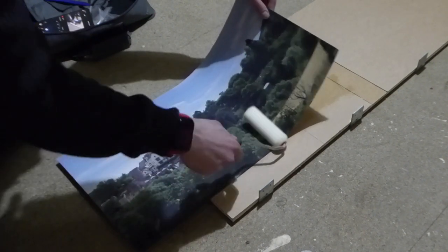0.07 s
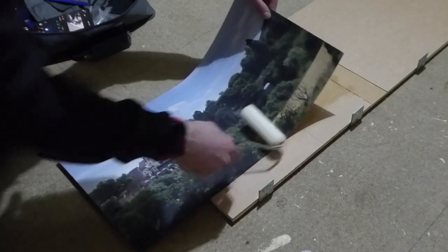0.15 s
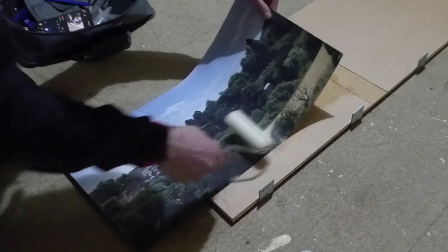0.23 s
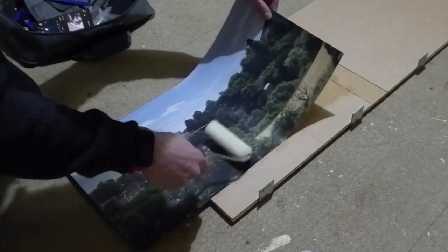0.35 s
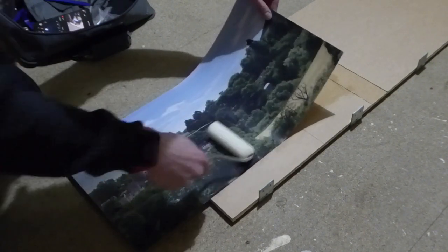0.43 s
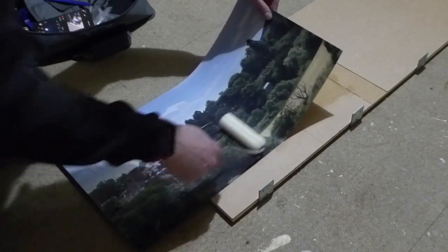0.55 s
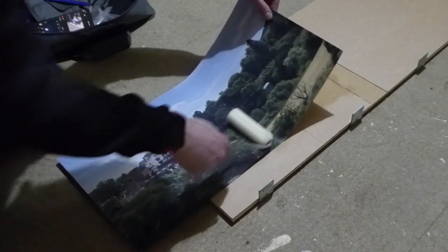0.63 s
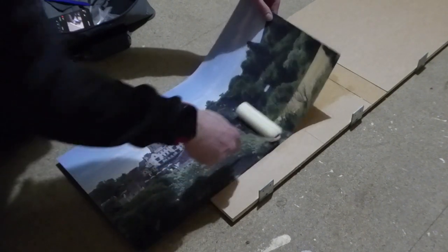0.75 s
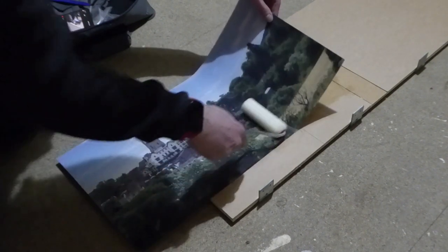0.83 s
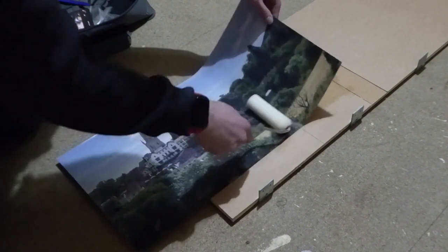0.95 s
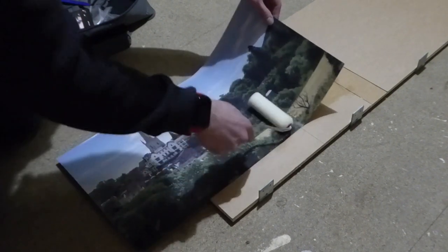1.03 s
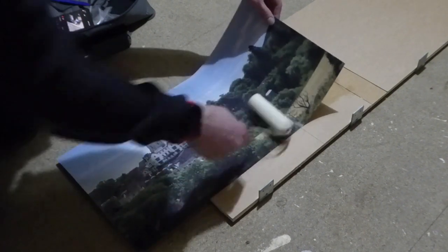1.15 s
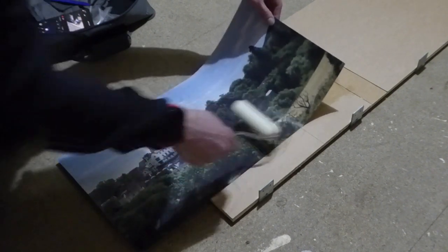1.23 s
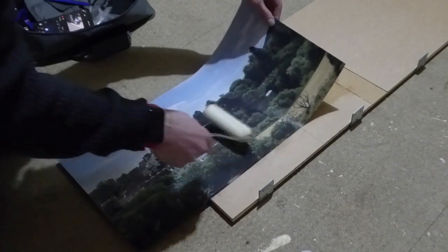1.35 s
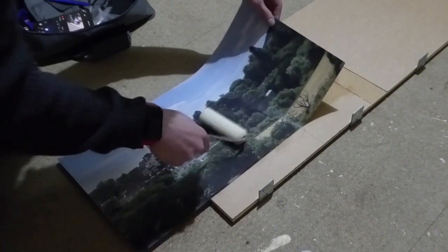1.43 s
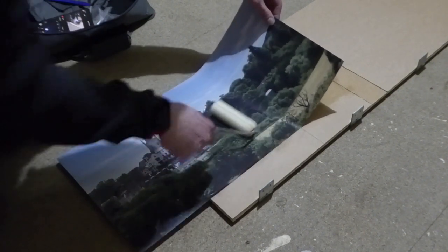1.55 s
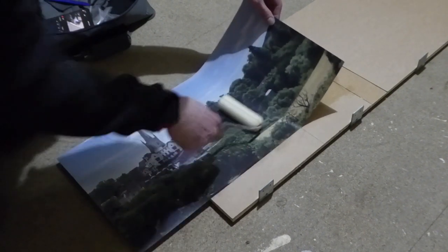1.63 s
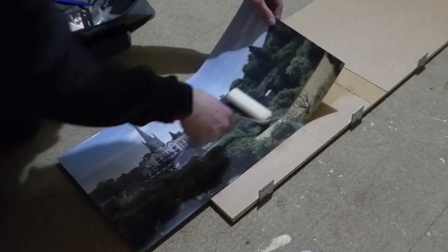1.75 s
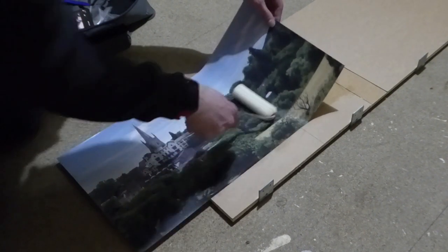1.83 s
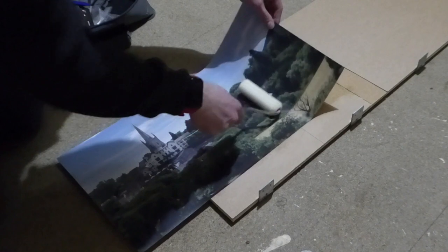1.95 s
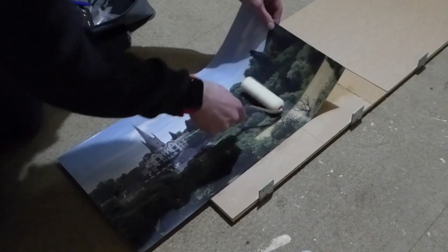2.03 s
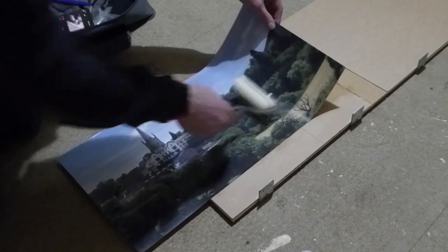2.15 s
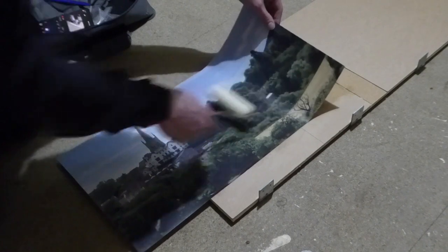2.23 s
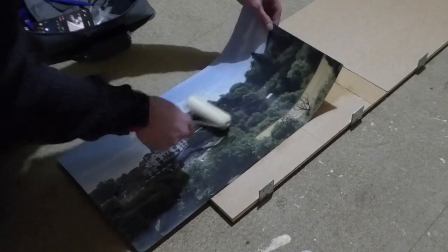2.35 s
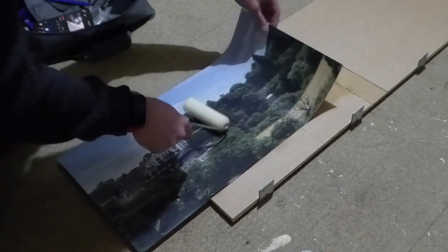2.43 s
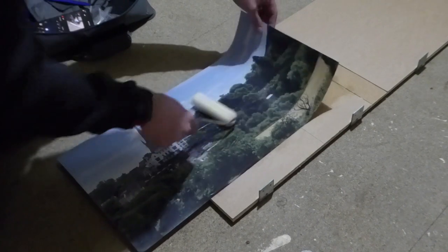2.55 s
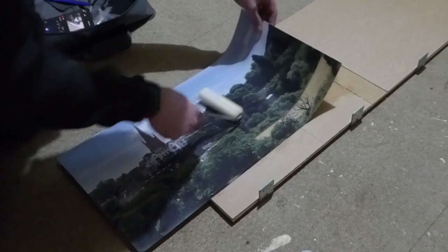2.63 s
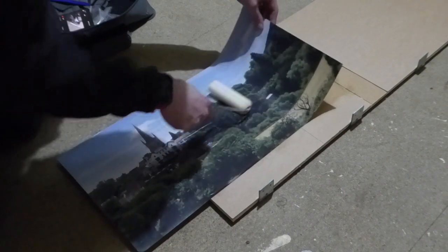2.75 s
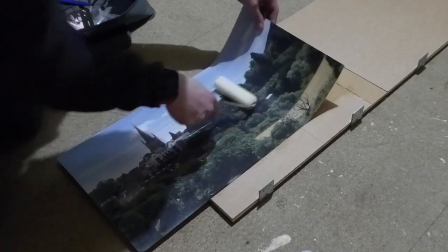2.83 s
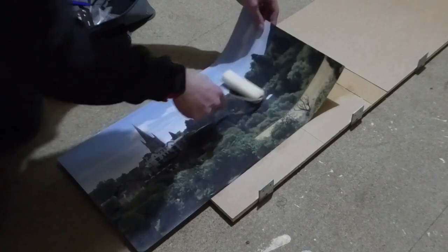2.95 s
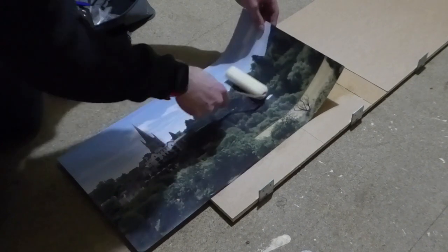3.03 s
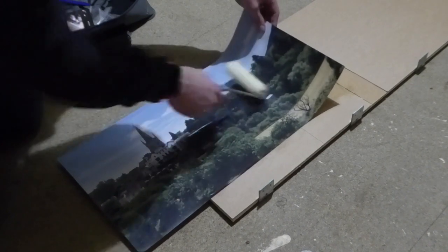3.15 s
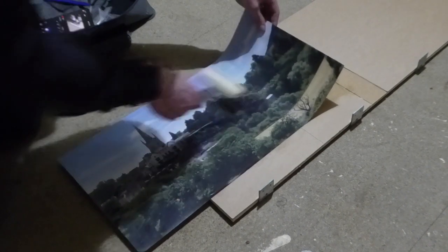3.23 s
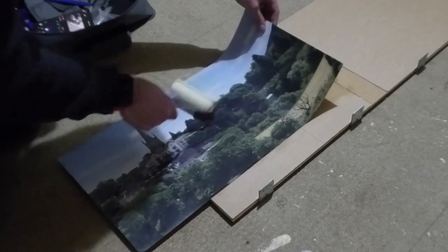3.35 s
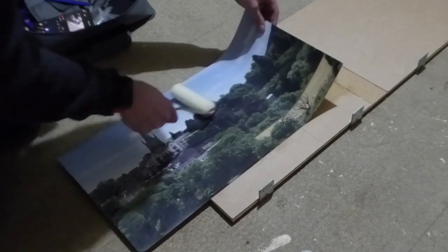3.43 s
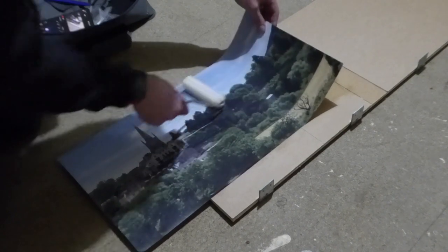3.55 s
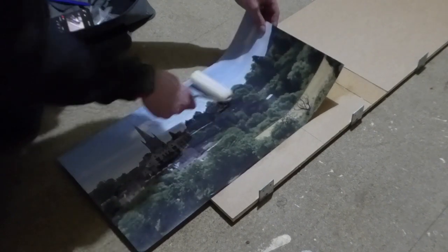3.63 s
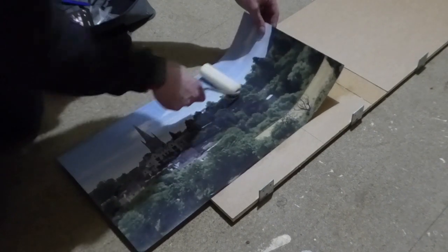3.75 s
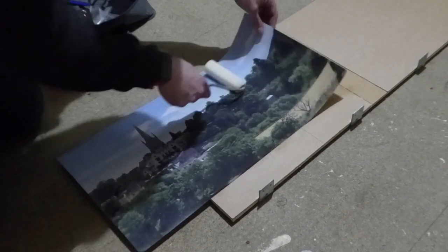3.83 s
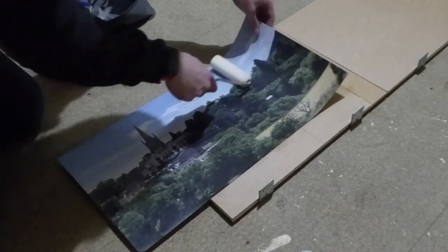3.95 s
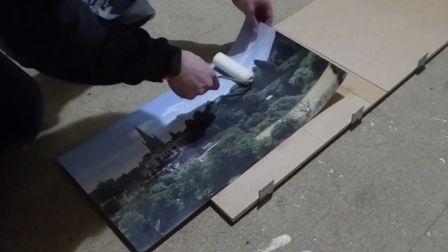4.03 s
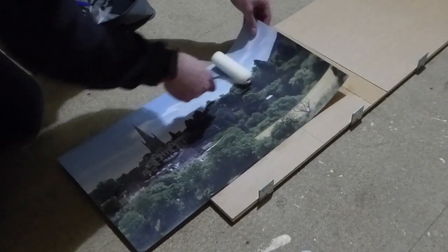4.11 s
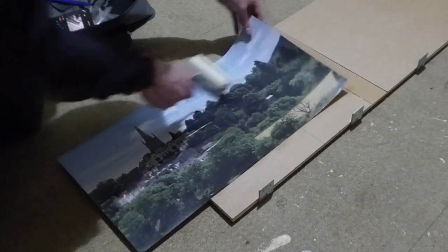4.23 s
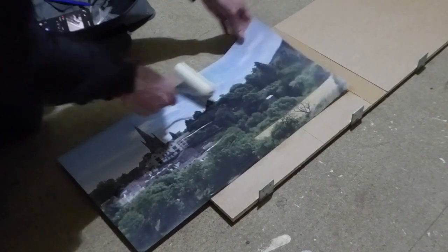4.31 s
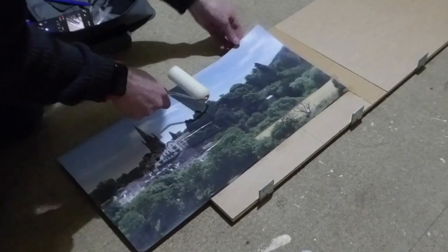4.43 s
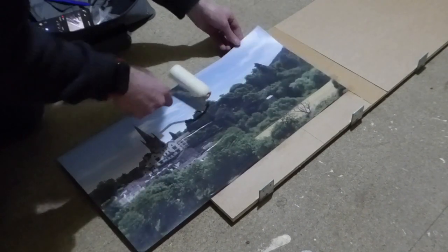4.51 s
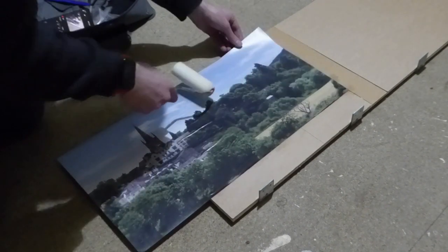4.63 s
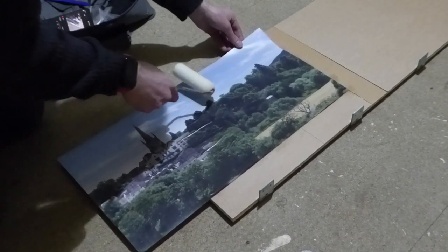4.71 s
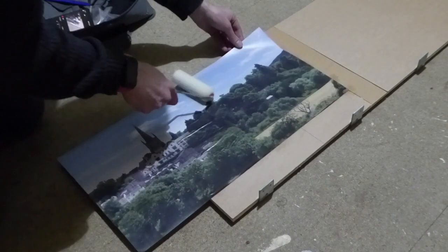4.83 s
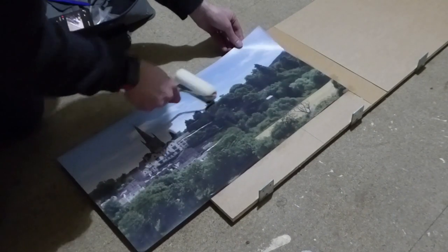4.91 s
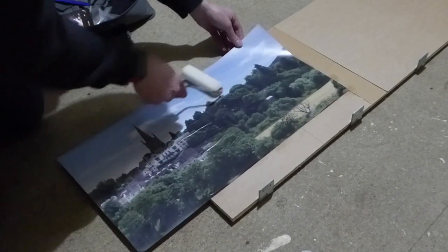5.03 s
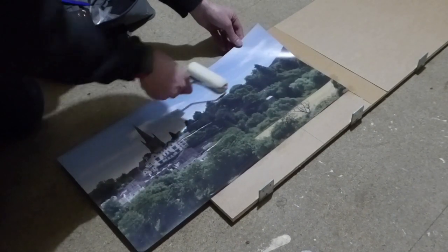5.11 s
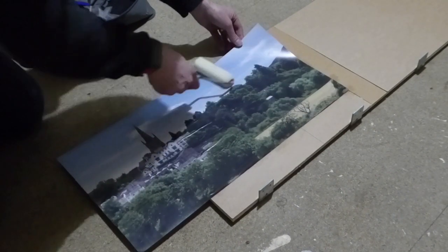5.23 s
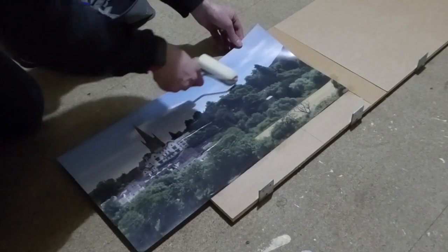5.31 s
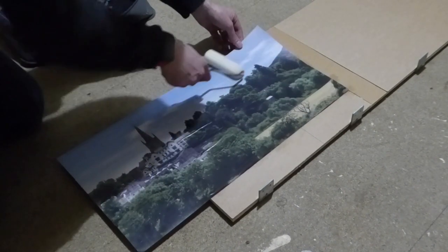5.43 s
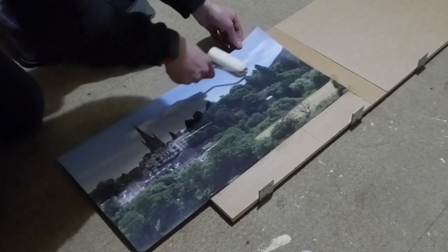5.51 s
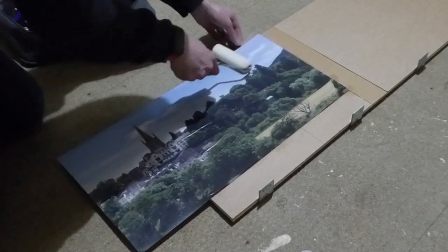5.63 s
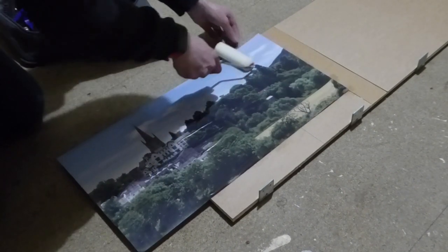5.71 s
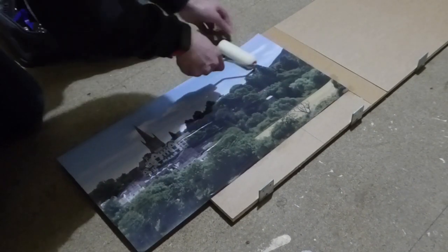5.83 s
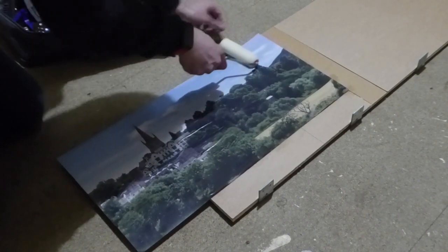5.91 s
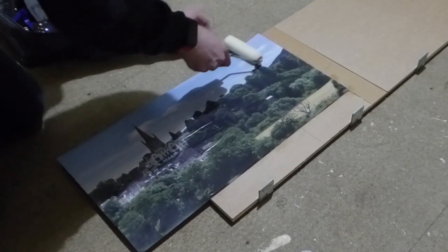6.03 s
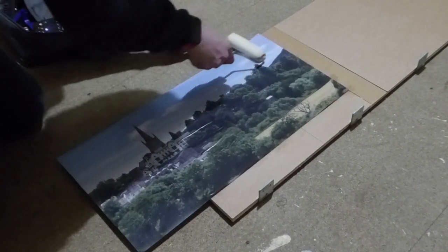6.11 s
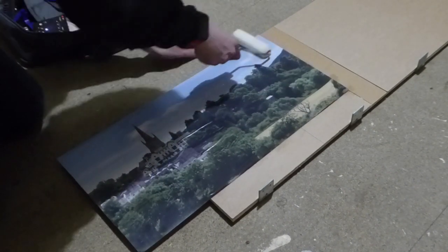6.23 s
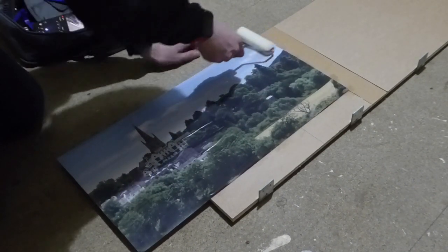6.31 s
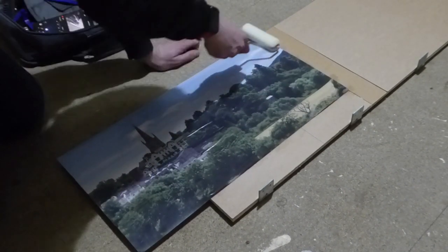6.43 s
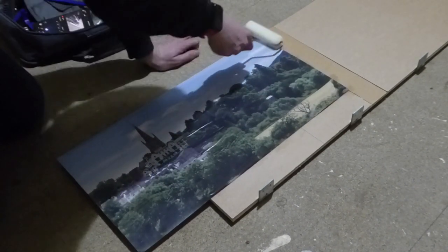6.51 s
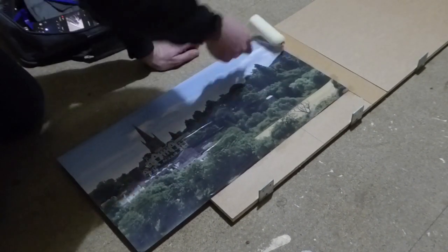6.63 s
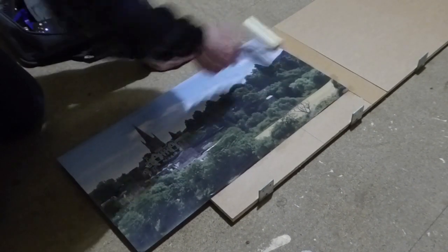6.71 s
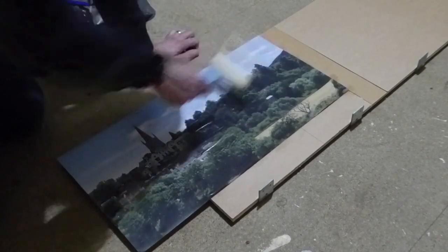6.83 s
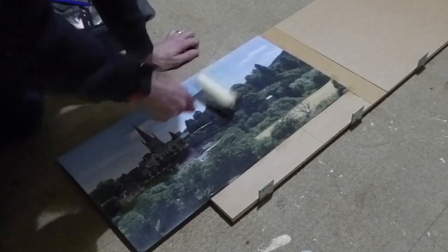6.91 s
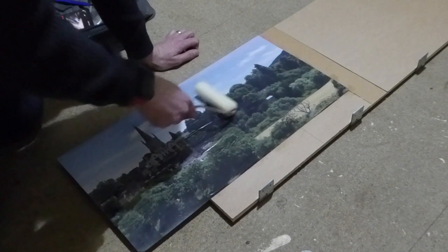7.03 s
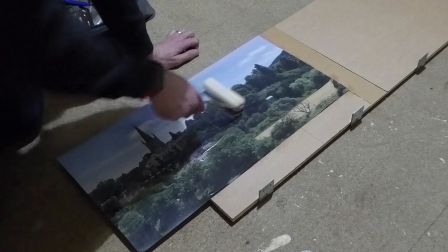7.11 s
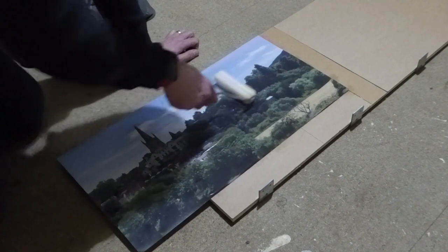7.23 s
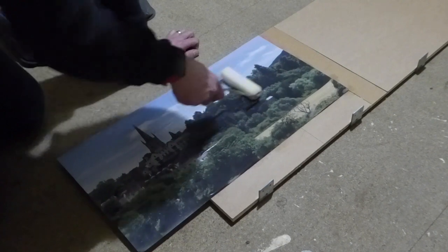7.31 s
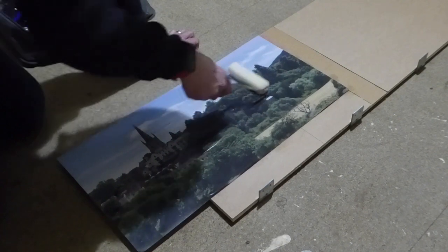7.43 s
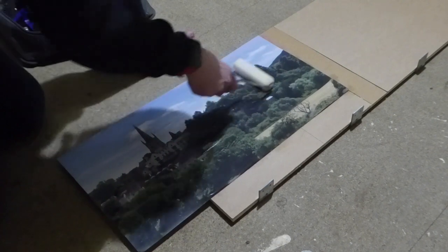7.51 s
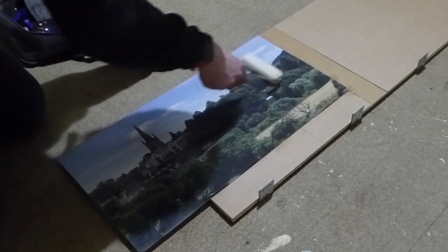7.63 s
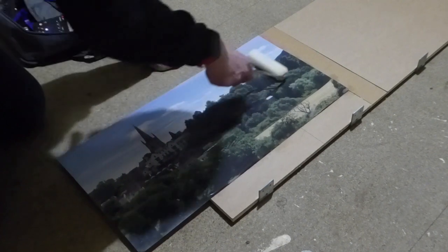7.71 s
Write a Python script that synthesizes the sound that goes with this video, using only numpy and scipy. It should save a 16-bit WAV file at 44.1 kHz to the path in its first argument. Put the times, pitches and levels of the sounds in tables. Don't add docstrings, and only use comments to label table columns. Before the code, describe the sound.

Close to the microphones, a small foam roller is pushed again and again across paper on a board. Each stroke is a grainy hiss with a rough, unsteady chattering squeak. Between strokes the roller lifts and lands with sharp clicks, hollow knocks and dull thuds. The later strokes run longer, then one very loud crack precedes a final push. A small hard room answers briefly over faint hum and hiss.

```python
import sys
import numpy as np
from scipy import signal
from scipy.fft import rfft, irfft, next_fast_len
from scipy.io import wavfile
from scipy.ndimage import uniform_filter1d, map_coordinates

SR = 44100
rng = np.random.default_rng(int(sys.argv[2]) if len(sys.argv) > 2 else 0)


def master_out(mix):
    frames = np.transpose(np.atleast_2d(mix))
    ceiling = np.clip(frames, -1, 1)
    pcm = np.round(ceiling * 32767).astype(np.int16)
    wavfile.write(sys.argv[1], SR, pcm)


def gain_from_db(level_db):
    decades = np.asarray(level_db, float) / 20
    return 10 ** decades


N = 342216


def unit(x):
    return x / np.sqrt(np.mean(x ** 2) + 1e-20)


def along(points, hz):
    f, v = np.transpose(points)
    return np.interp(np.log(hz + 1), np.log(f + 1), v)


def wobble(rate):
    knots = rng.standard_normal(int(N * rate / SR) + 4)
    return map_coordinates(knots, [np.arange(N) * rate / SR])


def swells(rows, width_s):
    t = np.arange(N) / SR
    return sum(db * np.exp(-((t - s) / width_s) ** 2) for s, db in rows)


def filtered(x, response):
    n = x.shape[-1]
    m = next_fast_len(n + 8192)
    return irfft(rfft(x, m) * response(np.fft.rfftfreq(m, 1 / SR)), m)[..., :n]


def peak(f, hz, width):
    return 1j * f * width / (hz * hz - f * f + 1j * f * width)


def spread(pair, alike):
    turn = lambda hz: np.arccos(np.clip(along(alike, hz), -1, 1)) / 2
    mid, side = filtered(pair, lambda hz: np.array([np.cos(turn(hz)), np.sin(turn(hz))]))
    return np.array([mid + side, mid - side])


def stroke_curves():
    # start_s, level_db
    strokes = [
        [(0.0, -41.5), (0.022, -49), (0.04, -51.5), (0.108, -48.5), (0.19, -70)],
        [(0.62, -51), (0.658, -54), (0.67, -48), (1.006, -46), (1.104, -54.5), (1.16, -86)],
        [(1.64, -54.5), (1.728, -50.5), (1.826, -48), (1.92, -43), (2.09, -56.5), (2.14, -67)],
        [(2.66, -52.5), (2.698, -61), (2.734, -51), (2.99, -46.5), (3.11, -55.5), (3.16, -82)],
        [(3.62, -54), (3.666, -52), (3.852, -43), (4.092, -50.5), (4.18, -73)],
        [(4.63, -78), (4.642, -84), (4.66, -57.5), (4.686, -62), (4.726, -85), (4.75, -78)],
        [(5.12, -64), (5.206, -51.5), (5.362, -50), (5.38, -52), (5.638, -50.5), (5.76, -53.5)],
        [(5.76, -54), (6.038, -54), (6.102, -51), (6.438, -50.5), (6.568, -49), (6.68, -67)],
        [(7.21, -57), (7.228, -54.5), (7.296, -46), (7.558, -47), (7.59, -47.5), (7.76, -48)],
    ]
    # press_s, held_s, release_s, pitch_hz (loaded slip rate),
    # level_db (chatter over hiss)
    presses = [
        (-.2, -.1, 0.087, 838, -3.5),
        (0.597, .78, 0.88, 821, -6),
        (1.671, 1.79, 1.84, 888, -0.5),
        (2.702, 2.84, 2.95, 860, -0.5),
        (3.452, 3.89, 4, 863, -3),
        (5.119, 5.32, 5.66, 883, -5),
        (6.132, 6.148, 6.76, 846, -6.5),
        (7.199, 7.31, 9, 855.7, -1),
    ]
    # time_s, rise_db
    squeaks = [(.866, 11.5), (1.72, 1), (2.98, 7), (3.734, 6), (3.882, -5), (3.95, 5.5), (5.352, 10.5),
               (5.44, 7.5), (5.6, 5), (6.24, 10), (6.42, 9), (7.25, 9), (7.39, 5), (7.55, 1), (7.65, -1),
               (7.72, 2.5)]
    free_hz, lead_s, ease_s = 1450, .015, .07
    slack_db, loose_db = 28, 4
    t = np.arange(N) / SR
    moving = sum((t >= rows[0][0]) * (t <= rows[-1][0]) for rows in strokes)
    moving = uniform_filter1d(np.minimum(moving, 1.), size=1500, mode="nearest")
    hiss_db = np.interp(t, *np.transpose(np.concatenate(strokes)))
    slip_hz = np.full(N, free_hz * 1.)
    chatter_db = swells(squeaks, .032) - slack_db
    for press, held, free, hz, db in presses:
        slip_hz += (hz - free_hz) * np.interp(t, [press, held, free, free + ease_s], [0, 1, 1, 0])
        bearing = np.interp(t, [press - lead_s, press, held, free, free + ease_s / 2],
                            [0, 1 - loose_db / slack_db, 1, 1, 0])
        chatter_db += (slack_db + db) * bearing
    return moving, hiss_db, hiss_db + chatter_db, slip_hz


def sheet_ring(f):
    # pitch_hz, width_hz, level_db
    sheet = [(566, 97, -38), (872, 41, -7), (1324, 141, 11), (1590, 33, 11), (2136, 300, -2.5),
             (3770, 57, -37), (3960, 210, -4), (4510, 1600, -1)]
    return 1 + sum(gain_from_db(db) * peak(f, hz, width) for hz, width, db in sheet)


def grit(depth_db):
    return gain_from_db(depth_db * wobble(700) + 1.1 * wobble(40)) * rng.standard_normal(N)


def paper_hiss(hiss_db, axle_db, slip_hz):
    # pitch_hz, level_db per Hz
    paper = [(350, -21), (600, -6.5), (714, -11.5), (849, -9), (1010, -12), (1630, -11.5), (1770, -4.5),
             (3400, -3), (8000, -23.5), (10400, -48), (17600, -120)]
    hiss = unit(filtered(grit(0.33), lambda f: gain_from_db(along(paper, f)) * sheet_ring(f)))
    repeat = .4 * np.clip((axle_db - hiss_db + 22) / 16, 0, 1)
    lag = SR / slip_hz * (1 + .045 * wobble(150))
    late = lambda v: np.interp(np.arange(N) - lag, np.arange(N), v)
    hiss = hiss + repeat * late(hiss + repeat * late(hiss))
    return gain_from_db(hiss_db) * hiss / np.sqrt(1 + repeat ** 2 + repeat ** 4)


def foam_sheen(hiss_db):
    # pitch_hz, level_db per Hz
    sheen = [(4120, -19), (7000, -9), (8080, -13), (9840, -6), (11700, -7), (13500, -17), (15300, -39)]
    return gain_from_db(hiss_db - 13) * unit(filtered(grit(1), lambda f: gain_from_db(along(sheen, f))))


def axle_chatter(axle_db, slip_hz):
    tilt = [3, -1.5, -7, -16, -24, -60]
    unsteady_hz = slip_hz * (1 + .028 * wobble(30) + .048 * wobble(200))
    phase = 2 * np.pi * np.cumsum(unsteady_hz) / SR
    slips = 0
    for k, db in enumerate(tilt):
        bite_db = 0.5 if k > 0 else 0
        slips = slips + gain_from_db(db + bite_db + 3.2 * wobble(70)) * np.cos((k + 1) * phase)
    return gain_from_db(axle_db - 3) * unit(filtered(slips, lambda f: 4 + sheet_ring(f)))


def board_hum(hiss_db):
    # time_s, rise_db
    hums = [
        (0, 17),
        (1.014, 12.5),
        (1.896, 15.5),
        (5.85, 23),
        (5.95, 8),
        (6.1, 11),
        (7.58, 15),
    ]
    hum = unit(filtered(rng.standard_normal(N), lambda f: peak(f, 525, 85) ** 2))
    return gain_from_db(hiss_db - 22.5 + swells(hums, 0.041) + 1.1 * wobble(14)) * hum


def rolling():
    moving, hiss_db, axle_db, slip_hz = stroke_curves()
    friction = paper_hiss(hiss_db, axle_db, slip_hz) + foam_sheen(hiss_db)
    return moving * (friction + axle_chatter(axle_db, slip_hz) + board_hum(hiss_db))


def room_tone():
    # pitch_hz, level_db per Hz
    quiet = [(15, -54), (25, -15), (69, -33), (136, -14.5), (232, -7.5), (280, -4.5), (312, -8.5),
             (347, -5), (698, -7), (1440, -7.5), (1560, -11), (1890, -12), (4700, -19), (5670, -20),
             (15300, -31)]
    # pitch_hz, correlation (-1 to 1)
    quiet_alike = [(60, -0.17), (130, -0.14), (290, 0.6), (640, -0.38), (1400, -0.68), (3080, 0.063),
                   (6760, 0.57), (14900, 0.39)]
    ports = lambda f: 1 + gain_from_db(-1.5) * peak(f, 4700, 260) + gain_from_db(1.5) * peak(f, 10800, 2000)
    pair = filtered(rng.standard_normal((2, N)), lambda f: gain_from_db(along(quiet, f)) * ports(f))
    return gain_from_db(-56 + .5 * wobble(6)) * unit(spread(pair, quiet_alike))


def floor_rumble():
    # time_s, rise_db
    shifts = [
        (.67, 8),
        (1.77, 10),
        (3.65, 9),
        (4.52, 7),
        (5.5, 2),
        (5.8, 8.5),
        (6.2, 3),
        (7.05, -4),
        (7.28, 8),
    ]
    pair = filtered(rng.standard_normal((2, N)), lambda f: peak(f, 150, 62) * peak(f, 140, 210))
    rumble = unit(spread(pair, [(60, 0.62), (150, 1.0)]))
    return gain_from_db(-71.5 + swells(shifts, 0.13) + 0.88 * wobble(8.2)) * rumble


def walls(x):
    # pitch_hz, level_db
    wall_db = [(150, 4.5), (1000, 0.4), (4000, -0.6), (10000, 6)]
    # pitch_hz, t60_s
    wall_t60 = [(150, 0.37), (1000, 0.29), (4000, 0.3), (12000, 0.23)]
    # pitch_hz, correlation (-1 to 1)
    wall_alike = [(150, 0.98), (500, 0.96), (1000, 0.71), (2000, 0.67), (4000, 0.67), (9000, 0.53)]
    hz, t, z = signal.stft(rng.standard_normal((2, SR * 2 // 5)), SR, nperseg=256)
    rise = 1 - np.exp(-t / 0.0039)
    decay_db = along(wall_db, hz)[:, None] - 60 * t / along(wall_t60, hz)[:, None]
    tail = signal.istft(z * rise * gain_from_db(decay_db), SR, nperseg=256)[1]
    tail = spread(tail, wall_alike)
    answer = signal.fftconvolve(x[None], tail, axes=1)[:, :len(x)]
    return unit(answer) * np.sqrt(np.mean(x ** 2))


def add(out, s, blow, room_db):
    # delay_s, level_db
    echoes = [
        (.0077, -8),
        (.011, -17),
        (.0128, -14),
        (.0195, -16),
        (.03, -18),
    ]
    near = blow.copy()
    for delay_s, db in echoes:
        near += gain_from_db(db) * np.pad(blow, (round(delay_s * SR), 0))[:len(blow)]
    out[:, round(s * SR):][:, :len(blow)] += near * gain_from_db([[.8], [-.8]]) + gain_from_db(room_db) * walls(blow)


def crack(t60, spike, response):
    t = np.arange(SR * 2 // 5) / SR
    burst = gain_from_db(-60 * t / t60) * rng.standard_normal(len(t))
    burst[3] += spike
    shaped = filtered(burst, response)
    return shaped / np.abs(shaped).max()


def frame_snaps(out):
    # start_s, level_db (peak), pitch_hz (upper ring), lower_db and spark_db (re peak)
    snaps = [(0.2038, -23.5, 3320, -27, -23), (0.5187, -19, 4600, -10, -20), (0.5197, -20, 3700, -10, -22),
             (1.2102, -36, 3420, -5, -22), (1.3179, -35, 4570, -11, -19), (1.5572, -29.5, 3230, -12, -19),
             (2.167, -35, 4960, -6, -18), (2.5332, -18, 3360, -44, -21), (3.1907, -28, 3900, -7, -20),
             (3.276, -41, 5100, -21, -24), (3.4538, -31, 4120, -6, -25), (3.5106, -16.5, 4770, -3.5, -12.5),
             (4.2183, -27.5, 3730, -8, -24), (4.2891, -32, 4270, 1, -24), (4.4487, -47, 3500, 3, -17),
             (4.9252, -15, 4980, -18.5, -13.5), (6.915, -37.5, 4770, -17, -17),
             (6.9613, -37, 4170, -5, -17.5), (7.0945, -3, 3880, -18.5, -20.5)]
    for s, db, hz, lower_db, spark_db in snaps:
        upper = lambda f: peak(f, hz, 1700) * peak(f, hz, 3000)
        lower = lambda f: gain_from_db(lower_db + 11.5) * peak(f, 2330, 490) * peak(f, 1070, 2200)
        click = crack(0.018, 15.6, lambda f: upper(f) - lower(f))
        spark = crack(.024, 14, lambda f: peak(f, 9600, 2600) * peak(f, 6000, 7500))
        blow = gain_from_db(db + 2) * click + gain_from_db(db + spark_db + 12.5) * spark
        add(out, s, blow, 1.5 - .12 * (db + 29))


def core_knocks(out):
    # start_s, level_db (peak), pitch_hz, room_db
    knocks = [(0.205, -25, 1120, 0.5), (0.517, -26, 985, 7), (1.213, -33.5, 1100, 1.5),
              (1.318, -33, 860, -1), (1.544, -38.5, 872, 10), (2.169, -33, 1020, 7.5),
              (2.535, -27.5, 960, 3.5), (3.194, -28, 830, 4.5), (3.277, -27, 1080, -0.5),
              (3.454, -33, 1020, 2), (3.512, -29, 882, 4), (4.22, -28, 1020, 1), (4.287, -27.5, 915, -2),
              (4.447, -43, 856, 2), (4.924, -28.5, 930, -1), (6.147, -54, 1331, -6),
              (6.723, -34.5, 805, 3.5), (6.961, -36.5, 800, -1), (7.094, -17, 852, 0)]
    for s, db, hz, room_db in knocks:
        knock = crack(.013, 14, lambda f: peak(f, hz, 360) * peak(f, hz, 800))
        add(out, s, gain_from_db(db - 3) * knock, room_db)


def ringing(modes, t):
    ring = 0
    for hz, db, t60 in modes:
        chance_db, detune = rng.normal(0, [1.5, .012])
        swell = 1 - np.exp(-t * hz / 2.0)
        ring += gain_from_db(db + chance_db - 60 * t / t60) * swell * np.sin(2 * np.pi * hz * (1 + detune) * t)
    return ring / np.abs(ring).max()


def board_thuds(out):
    # start_s, level_db (peak), low_db, middle_db, upper_db (mode groups)
    thuds = [(.515, -23, -12, -12.5, -10.5), (.854, -50, -16, -15, -6.5), (1.316, -45.5, -30, -17, -9.5),
             (1.553, -26, -8, -8, -8), (1.883, -43, -17, -8.5, -6), (2.103, -49, -10, -14, -11),
             (2.168, -47.5, -24, -15.5, -4.5), (2.531, -28.5, -19.5, -12.5, -17.5),
             (3.276, -47, -37, -13.5, -4.5), (3.451, -47.5, -28, -16, -4.5), (3.509, -22, -14.5, -15, -12),
             (4.287, -49.5, -28, -23, -3.5), (4.923, -28.5, -12.5, -13.5, -10),
             (5.461, -49, -7.5, -26, -21), (5.709, -51, -8.5, -20, -16), (6.146, -52.5, -27, -7, -22),
             (6.722, -60, -25, -18, -6), (7.0904, -18.5, -17.5, -15.5, -11.5)]
    # pitch_hz, level_db, t60_s
    board = [
        [(105, -9, .08), (128, -4, .13), (154, 0, .19), (172, -7, .16)],
        [(240, -4, .11), (266, 0, .14), (300, -5, .11)],
        [(345, -5, .13), (375, -3, .15), (428, -3, .12), (460, -3, .13), (519, 0, .14), (565, -7, .1),
         (660, -15, .12)],
    ]
    t = np.arange(SR * 2 // 5) / SR
    for s, db, *group_db in thuds:
        thud = sum(gain_from_db(db + g + 8) * ringing(modes, t) for g, modes in zip(group_db, board))
        thud = filtered(thud, lambda f: (1j * f / (100 + 1j * f)) ** 3)
        out[:, round((s + .0015) * SR):][:, :len(t)] += thud + gain_from_db(-6.5) * walls(thud)


def contacts():
    out = np.zeros((2, N + SR))
    frame_snaps(out)
    core_knocks(out)
    board_thuds(out)
    return out[:, :N]


def scene():
    roll = rolling()
    direct = roll * gain_from_db([[.9], [-.9]])
    room = gain_from_db(-0.5) * walls(roll) * gain_from_db([[.7], [-.7]])
    ports = lambda f: (1j * f / (60 + 1j * f)) ** 3 / (1 + (f / 13800) ** 14)
    return filtered(direct + room + contacts(), ports) + room_tone() + floor_rumble()


def roll_off(x):
    return signal.sosfilt(signal.butter(12, 15460, fs=SR, output="sos"), x)


def record(dry):
    # pitch_hz, level_db
    lean = [(150, 0), (500, -0.1), (1000, 1.5), (2000, 0.7), (4000, -0.5), (9000, 0.4)]
    fade = lambda f: 1 / (1 + (f / 15000) ** 24)
    heard = filtered(dry, lambda f: gain_from_db(along(lean, f) * [[.5], [-.5]]) * fade(f))
    return roll_off(np.clip(heard, -1, 1))


dry = scene()
out = record(dry)
master_out(out)
```